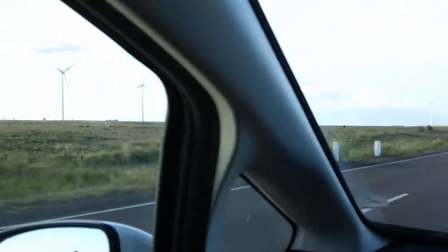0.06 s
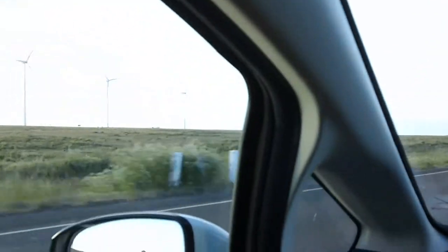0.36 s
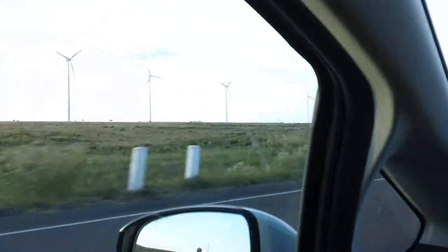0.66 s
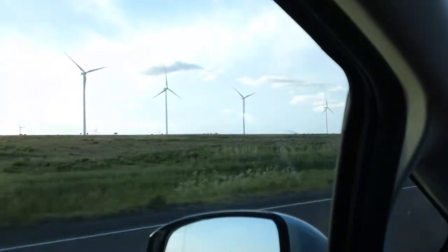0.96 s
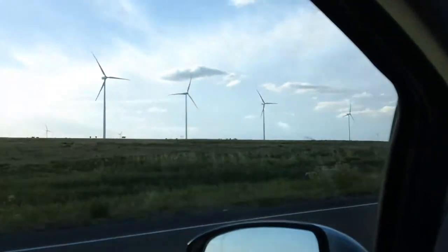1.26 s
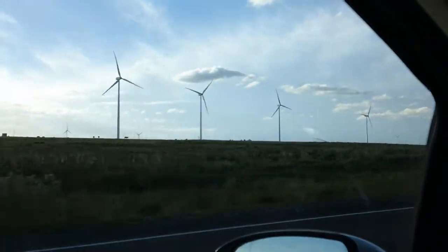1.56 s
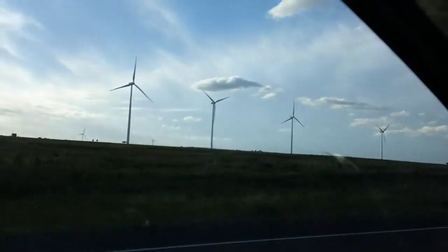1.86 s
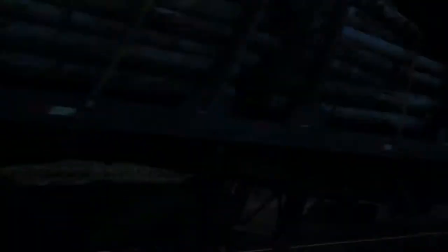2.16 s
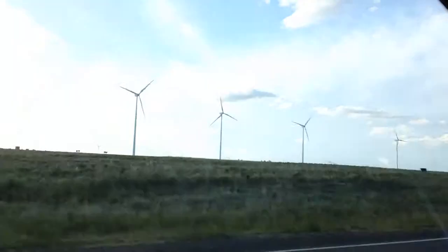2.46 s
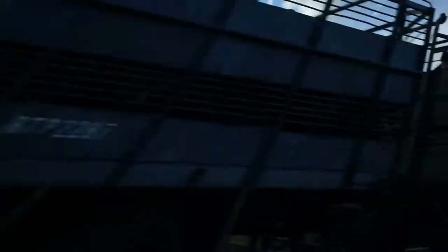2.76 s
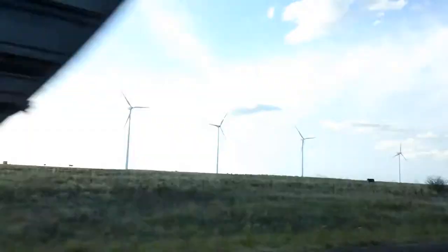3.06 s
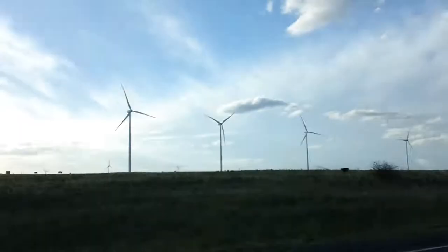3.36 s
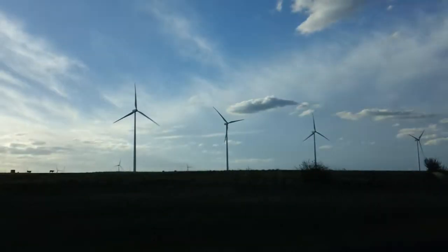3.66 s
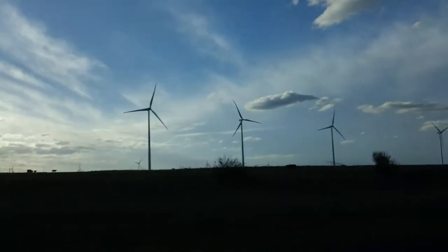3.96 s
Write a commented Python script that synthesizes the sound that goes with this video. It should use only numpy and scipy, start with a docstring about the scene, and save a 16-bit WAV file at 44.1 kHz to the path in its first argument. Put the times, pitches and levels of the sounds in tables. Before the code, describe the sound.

A car's low road rumble runs throughout, heard from inside, with soft bumps, tyre drone and wind hissing along the window. From about 0.5 to 2 seconds the drone firms into a wavering hum. An oncoming truck rushes past at around 2.7 seconds, leaving rougher air and a faint whine. At about 3.9 seconds plastic ticks lightly once, close to the microphone.

```python
"""Inside a car at highway speed, one microphone in the cabin. From the start the road shakes the body into a
low rumble and a swelling boom, the tyres drone, and wind hisses along the side window. Half a second in,
coarser asphalt firms the drone into a hum, and a few faint dry clicks sound. An oncoming truck sweeps past at
about 2.7 s; the air stays rougher after it, with a faint whine. Near the end, plastic ticks once close to the
microphone."""
import sys
import numpy as np
from scipy import signal
from scipy.fft import rfft, irfft
from scipy.io import wavfile
from scipy.ndimage import uniform_filter1d, minimum_filter1d

SR = 44100
rng = np.random.default_rng(int(sys.argv[2]) if len(sys.argv) > 2 else 0)


def unload_audio(sound):
    """Save the sound as a 16-bit wav file, at the path given as the first command line argument."""
    columns = np.transpose(np.atleast_2d(sound))
    # keep every value between -1 and 1, then stretch to whole-number steps
    steps = np.round(np.clip(columns, -1, 1) * 32767)
    wavfile.write(sys.argv[1], SR, steps.astype(np.int16))


N = 176400
TIME, FREQS = np.arange(N) / SR, np.fft.rfftfreq(N, 1 / SR)

# Colours as heard in the cabin. Each row: frequency in Hz, relative level in dB per Hz.
RUMBLE_COLOUR = [(15, -19.5), (28, -17), (39, -20), (49, -8), (68, -4), (82, -3.5), (100, 1), (120, 1.5),
                 (145, -15), (185, -5.5), (210, -14), (290, -7.5), (420, -28.5), (800, -29.5),
                 (2000, -85.5)]  # the road, through the body
BUMP_COLOUR = [(25, -18.5), (38, -22), (50, -6.5), (70, -12), (98, 5.5), (120, 2), (180, -11.5), (400, -28),
               (1200, -40), (3000, -63)]  # bumps, through the suspension
HEAVE_COLOUR = [(20, -18), (38, -8.5), (52, -2), (62, -2.5), (85, -18.5)]  # the whole body heaving
DRONE_COLOUR = [(150, -31.5), (235, -4.5), (260, -3.5), (288, -20), (315, -2), (338, 0), (375, -7),
                (396, -4), (425, -15), (475, -13), (510, -20.5), (570, -15.5), (800, -33.5), (1500, -40),
                (4000, -76.5)]  # tyres on asphalt
WIND_COLOUR = [(150, -13.5), (400, 4.5), (600, 2), (830, -0.5), (1000, -3), (1250, -9), (1500, -10),
               (2200, -18), (3000, -20.5), (4000, -23), (5500, -31.5), (8000, -39.5), (10500, -46.5),
               (12300, -57), (14500, -53), (15500, -53.5)]  # air along the side window
CLICK_COLOUR = [(2000, 0), (9000, 2.5), (15000, -8)]  # dry clicks
TRUCK_COLOUR = [(150, -24.5), (500, 16), (1000, 10.5), (1500, -1), (2100, 2.5), (3000, -11), (4500, -9),
                (6000, -25.5), (9000, -30), (12000, -46.5), (15500, -47.5)]  # the rush of the passing truck
GUST_COLOUR = [(800, -1), (2500, 3), (4500, 3), (7000, -5), (10000, -13), (12000, -21), (15500, -28)]  # hiss off its trailer
WAKE_COLOUR = [(200, 12.5), (450, -3.5), (600, 7.5), (750, -17), (1000, -7), (1500, -24.5), (2200, -24.5),
               (4500, -33), (9000, -59), (15500, -49)]  # churned air behind it
TICK_COLOUR = [(500, -3), (2000, 5), (3200, 6), (5500, -2), (9200, -5), (12000, -25), (15500, -30)]  # plastic, close by

# How the running sounds rise and fall. Each row: time in seconds, level in dB.
RUMBLE_CURVE = [(0, -24.5), (.55, -19), (.95, -20), (1.1, -22.5), (1.6, -22.5), (1.95, -17.5), (2.1, -25.5),
                (2.4, -22), (2.55, -23), (3, -21), (3.35, -20.5), (3.62, -21), (3.82, -20.5), (4, -25.5)]
BOOM_CURVE = [(0, -22.5), (.11, -14), (.22, -23), (.35, -22), (.4, -19.5), (.57, -13.5), (.7, -22.5),
              (.9, -17), (1.06, -20.5), (1.21, -24.5), (1.29, -15.5), (1.4, -19.5), (1.46, -19),
              (1.52, -22), (1.68, -18), (1.8, -11), (1.87, -23), (2.11, -21.5), (2.19, -13), (2.28, -20),
              (2.45, -23), (2.52, -16), (2.58, -25.5), (2.72, -18), (2.79, -17), (2.9, -24), (2.98, -14.5),
              (3.05, -32), (3.16, -12.5), (3.24, -21), (3.37, -23.5), (3.45, -19.5), (3.54, -29.5),
              (3.72, -19), (3.92, -19), (4, -29.5)]
DRONE_CURVE = [(0, -21), (.3, -19), (.62, -20.5), (.71, -17), (.95, -22), (1.03, -25), (1.13, -28),
               (1.18, -18.5), (1.29, -23.5), (1.45, -20), (1.8, -17), (2.1, -24.5), (2.27, -23.5),
               (2.42, -25), (2.75, -26), (3.2, -26), (3.6, -28.5), (4, -28.5)]
WIND_CURVE = [(0, -27.5), (.2, -26.5), (.5, -27.5), (.82, -28), (1.02, -31.5), (1.28, -28.5), (1.36, -30.7),
              (1.66, -28), (1.93, -31), (2.08, -30), (2.25, -29), (2.7, -26.5), (3.2, -28.5), (3.5, -27.5),
              (3.85, -26.5), (4, -29)]

# Brief swells. Each row: time of the peak in seconds, level in dB.
ROAD_BUMPS = [(.27, -19.5), (.57, -17.5), (.65, -17.5), (.9, -14.5), (1.27, -14.5), (1.44, -17.5),
              (1.66, -15), (1.78, -16), (1.9, -20), (2.26, -16.5), (2.63, -17), (2.85, -19), (3.2, -15.5),
              (3.27, -21), (3.83, -25)]  # unevenness under the wheels
ROAD_WAVES = [(.23, -25), (.72, -30), (.87, -28), (1.48, -25.5), (1.76, -35.5)]  # long waves in the road
TRAILER_GUSTS = [(2.68, -56), (2.8, -50), (2.95, -51.5)]  # air thrown off the trailer

# Resonances at the core of the drone. Each row: centre in Hz, width in Hz, dB against the drone.
DRONE_RESONANCES = [(314, 14, -12.5), (338.8, 21, -10.5)]
# Tyre hum on coarser asphalt. Each row: time in seconds, pitch in Hz, level in dB.
HUM_CURVE = [(0.549, 335, -53), (.7, 345, -22.5), (.92, 338, -27), (1.08, 340, -40), (1.36, 342.6, -24),
             (1.46, 324.2, -21.5), (1.55, 334.1, -19.5), (1.69, 327.8, -19.5), (1.78, 343, -28),
             (1.95, 343, -30), (2.1, 340, -49)]
# Faint dry clicks. Each row: start in seconds, level in dB.
FAINT_CLICKS = [(.9738, -49), (1.7965, -46), (1.8122, -48)]
# The whine behind the truck. Each row: centre in Hz, width in Hz, level in dB.
WAKE_WHINE = [(573, 70, -37), (1238, 73, -42)]


def amp(db):
    """Decibels to gain."""
    return 10 ** (np.asarray(db) / 20)


def level(points):
    """Gain over time from (s, dB) points."""
    return amp(np.interp(TIME, *np.transpose(points)))


def swells(rows, spread_s):
    """Bell-shaped swells from (s, dB) rows."""
    return sum(amp(db) * np.exp(-((TIME - s) / spread_s) ** 2) for s, db in rows)


def noise(gain):
    """Noise of unit level, shaped by a gain at each frequency."""
    x = irfft(rfft(rng.standard_normal(N)) * gain, N)
    return x / x.std()


def coloured(points):
    """Noise with a spectrum of (Hz, dB) points, silent above the last."""
    hz, db = np.transpose(points)
    return noise(amp(np.interp(np.log(FREQS + 1), np.log(hz), db, right=-np.inf)))


def ringing(hz, width_hz):
    """A resonance with steep skirts, shaken at random."""
    return noise(1 / (1 + (2 * (FREQS - hz) / width_hz) ** 2))


def steadied(x, samples=6000):
    """Evens out slow swells to unit level and keeps the quick flutter."""
    power = uniform_filter1d(uniform_filter1d(x ** 2, samples), samples)
    return x / np.sqrt(power)


def road():
    """The road shakes the body, bumps thump and heave through it, and the cabin booms in swells."""
    rumble = steadied(coloured(RUMBLE_COLOUR), samples=4000) * level(RUMBLE_CURVE)
    thumps = steadied(coloured(BUMP_COLOUR), samples=1800) * swells(ROAD_BUMPS, spread_s=0.037)
    heaves = steadied(coloured(HEAVE_COLOUR), samples=2600) * swells(ROAD_WAVES, spread_s=0.084)
    boom = steadied(ringing(hz=157.1, width_hz=31.6), samples=1600) * level(BOOM_CURVE)
    return rumble + thumps + heaves + boom


def tyres():
    """Below the floor the tread drones on the asphalt and rings the cabin; the air in the tyres rings too."""
    core = sum(amp(db) * ringing(hz, width) for hz, width, db in DRONE_RESONANCES)
    drone = steadied(coloured(DRONE_COLOUR) + core, samples=4000) * level(DRONE_CURVE)
    cavity = amp(-30.5) * steadied(ringing(hz=223.2, width_hz=7.5), samples=12000)
    return drone + cavity


def wind():
    """Air hisses along the outside of the side window with a slight flutter."""
    depth_db, corner_hz = 0.5, 30
    flutter = noise(1 / (1 + (FREQS / corner_hz) ** 2))
    return coloured(WIND_COLOUR) * level(WIND_CURVE) * amp(depth_db * flutter)


def tyre_hum():
    """On coarse asphalt the drone firms up into one wavering note."""
    waver_hz, waver_rate_hz = 4.1, 14.8
    s, hz, db = np.transpose(HUM_CURVE)
    pitch = np.interp(TIME, s, hz) + waver_hz * ringing(0, 2 * waver_rate_hz)
    tone = np.sqrt(2) * np.sin(2 * np.pi * np.cumsum(pitch) / SR)
    return amp(np.interp(TIME, s, db)) * tone


def faint_clicks():
    """A few tiny dry clicks, faint above the rumble."""
    t60_s = 0.005
    envelope = sum(amp(db - 60 * abs(TIME - s) / t60_s) * (TIME >= s) for s, db in FAINT_CLICKS)
    return envelope * coloured(CLICK_COLOUR)


def truck():
    """An oncoming truck's rush swells as it nears and fades as it leaves; gusts hiss off the trailer."""
    closest_s, spread_s = 2.72, 0.31
    passing = amp(-36.5) / (1 + ((TIME - closest_s) / spread_s) ** 2)
    gusts = swells(TRAILER_GUSTS, spread_s=0.072)
    return passing * coloured(TRUCK_COLOUR) + gusts * coloured(GUST_COLOUR)


def truck_wake():
    """The car runs into churned air behind the truck: a rougher rush and a breathy whine that stay."""
    entry_s, rise_s = 2.52, 0.081
    fade_in = 0.5 + 0.5 * np.tanh((TIME - entry_s) / rise_s)
    whine = sum(amp(db) * steadied(ringing(hz, width)) for hz, width, db in WAKE_WHINE)
    churn = amp(-29.5) * coloured(WAKE_COLOUR)
    return fade_in * (churn + whine)


def plastic_tick():
    """One light, bright tick of plastic close to the microphone."""
    start_s, rise_s, t60_s = 3.8775, 0.002, 0.06
    age = np.maximum(TIME - start_s, 0)
    envelope = np.minimum(age / rise_s, 1) * amp(-60 * age / t60_s)
    return amp(-35.5) * envelope * coloured(TICK_COLOUR)


def scene():
    """Everything sounding together, before the limiter."""
    driving = road() + tyres() + wind() + tyre_hum() + faint_clicks()
    return (driving + truck() + truck_wake() + plastic_tick())[None]


def record(dry):
    """After the microphone, a limiter catches peaks and recovers slowly; a low-pass trims the top."""
    ceiling_db, recovery_db_per_s, cutoff_hz = -3.6, 13, 15400
    over_db = np.maximum(20 * np.log10(abs(dry[0]) + 1e-9) - ceiling_db, 0)
    recovery_db = TIME * recovery_db_per_s
    duck_db = recovery_db - np.maximum.accumulate(over_db + recovery_db)
    smooth_db = uniform_filter1d(minimum_filter1d(duck_db, size=41), size=41)  # attack of about 1 ms
    lowpass = signal.butter(16, cutoff_hz, fs=SR, output="sos")
    return signal.sosfiltfilt(lowpass, dry * amp(smooth_db))


dry = scene()
out = record(dry)
unload_audio(out)
```